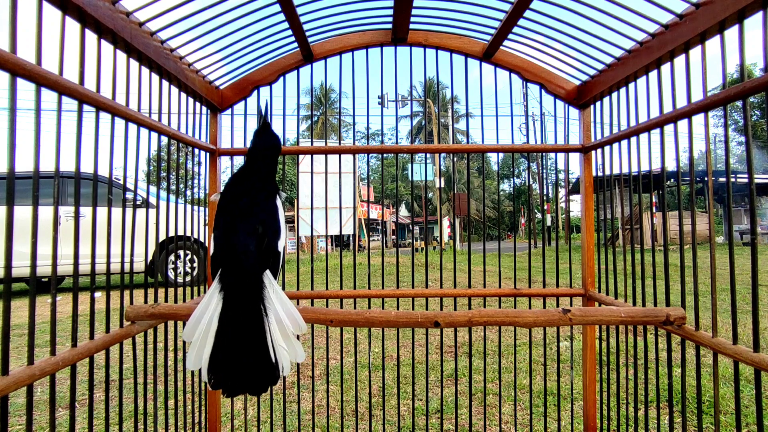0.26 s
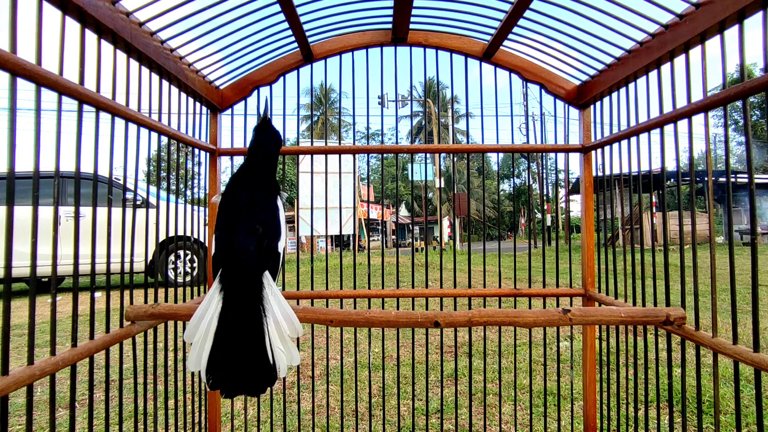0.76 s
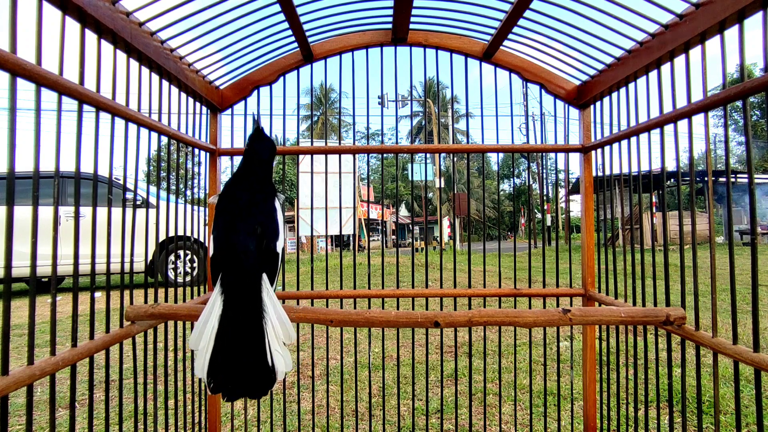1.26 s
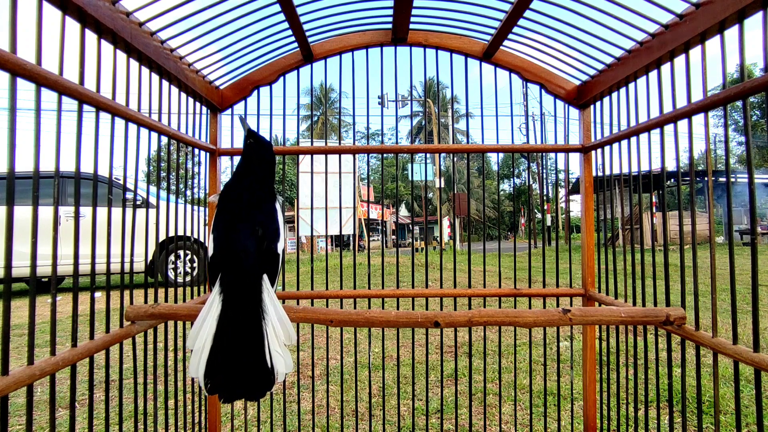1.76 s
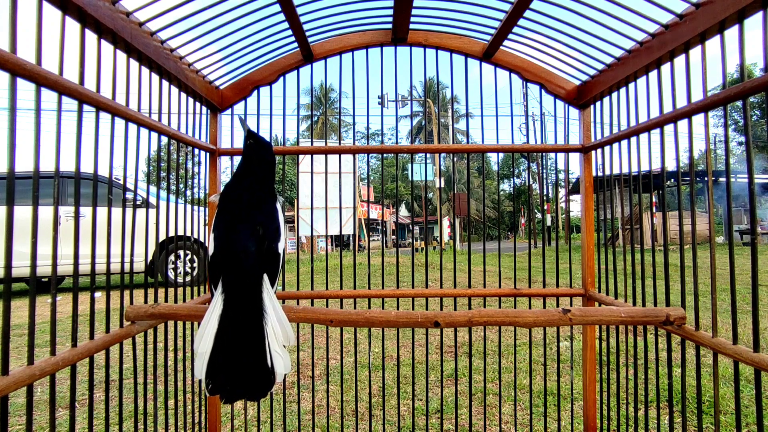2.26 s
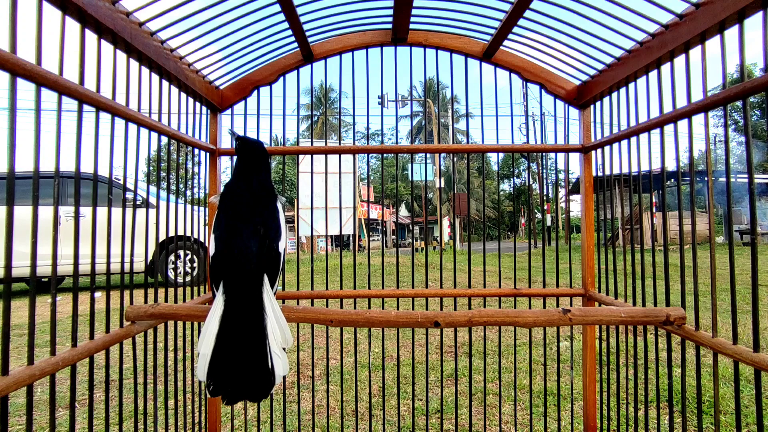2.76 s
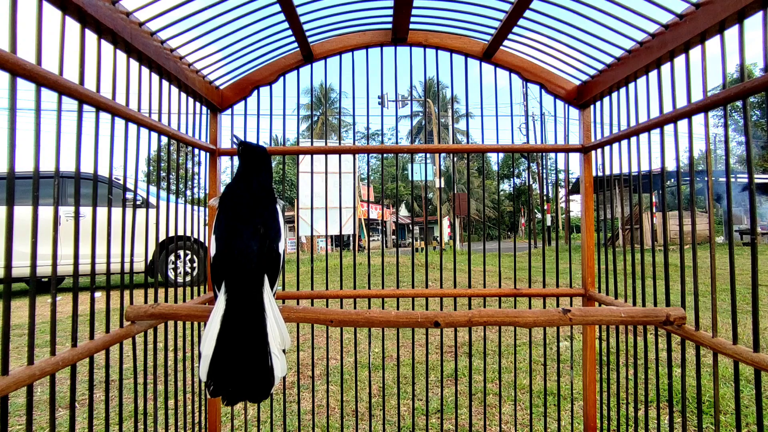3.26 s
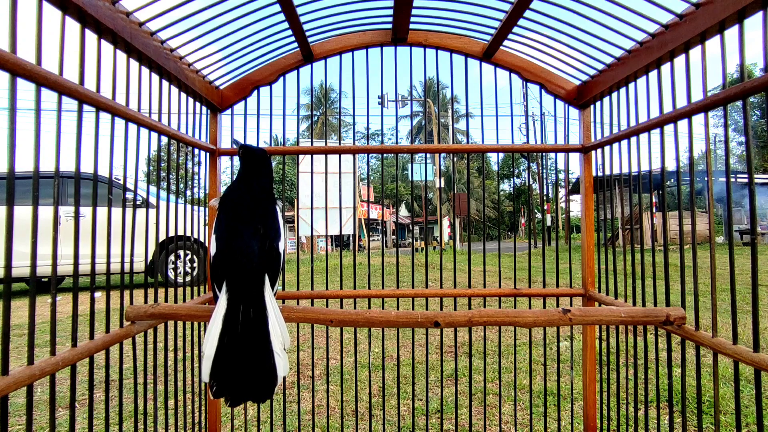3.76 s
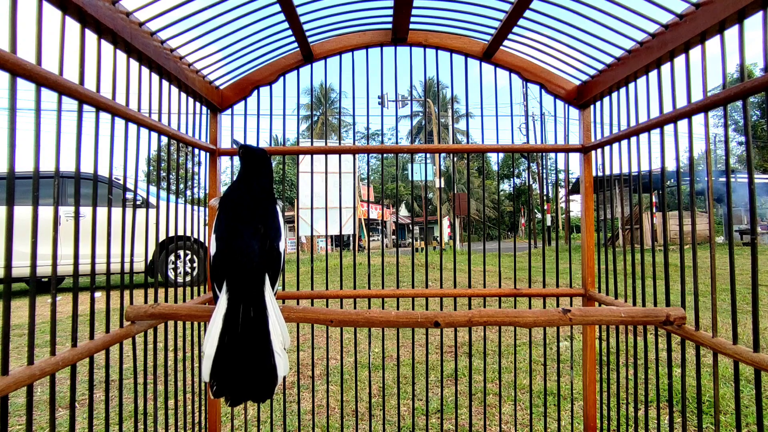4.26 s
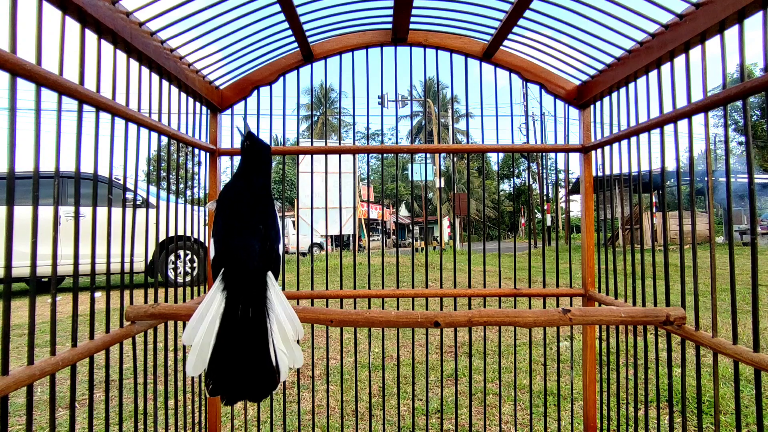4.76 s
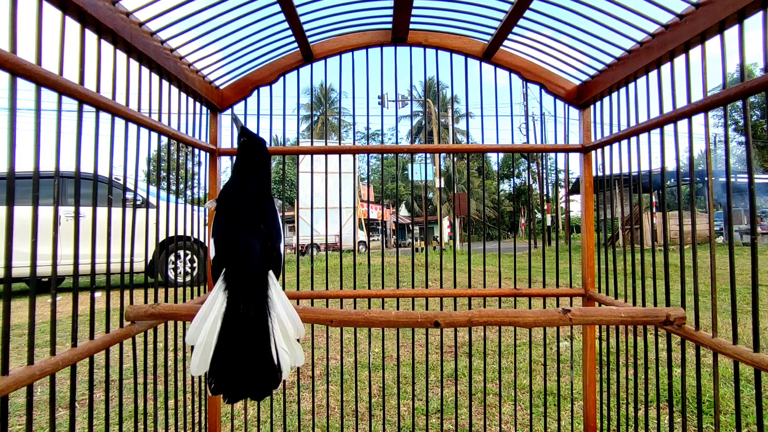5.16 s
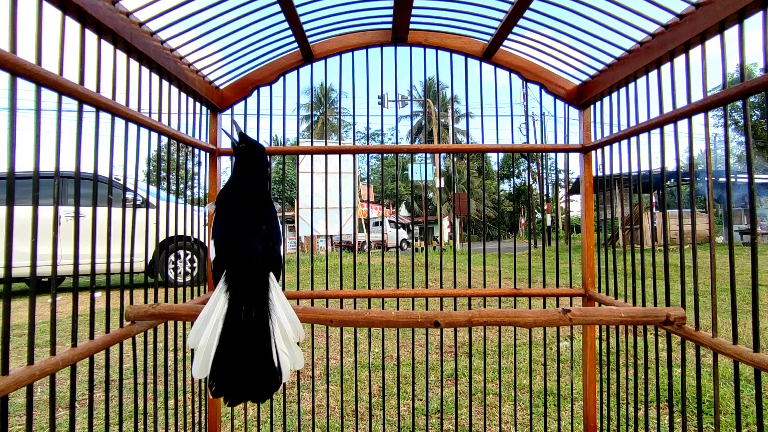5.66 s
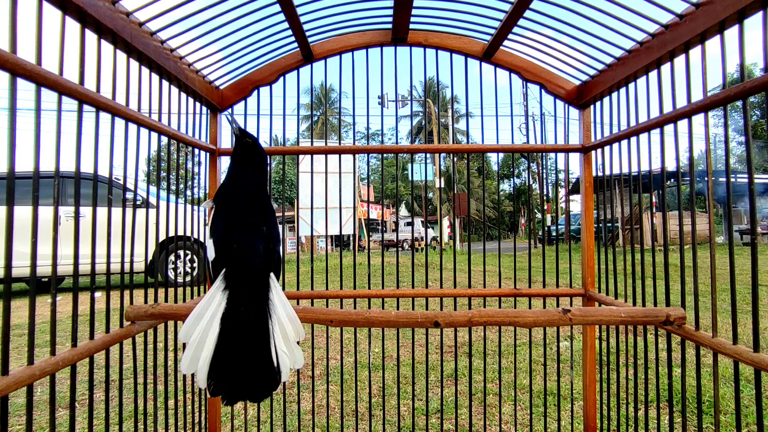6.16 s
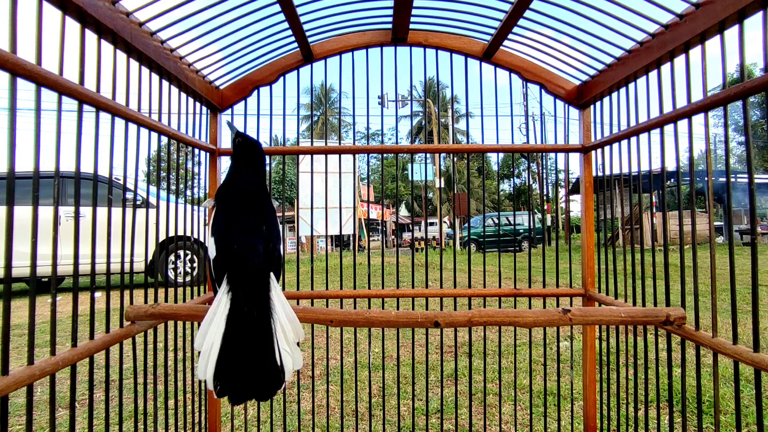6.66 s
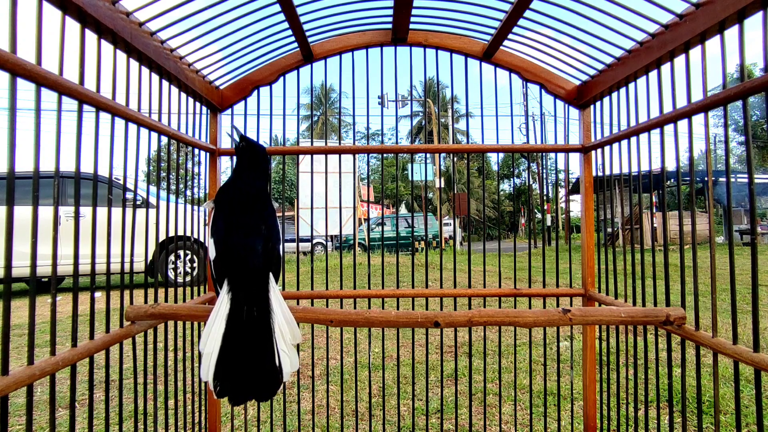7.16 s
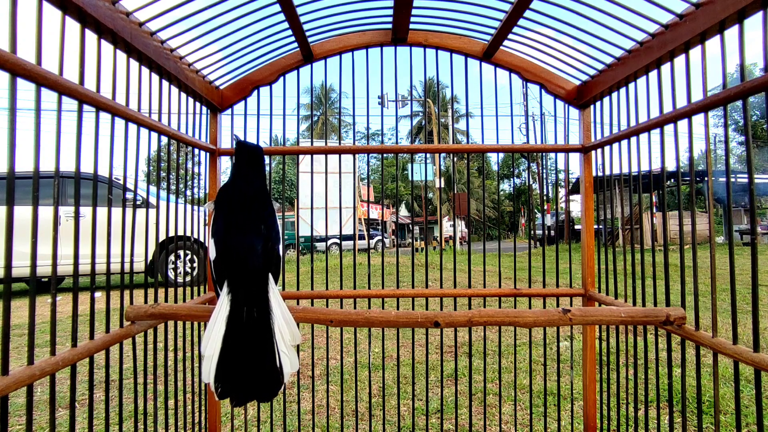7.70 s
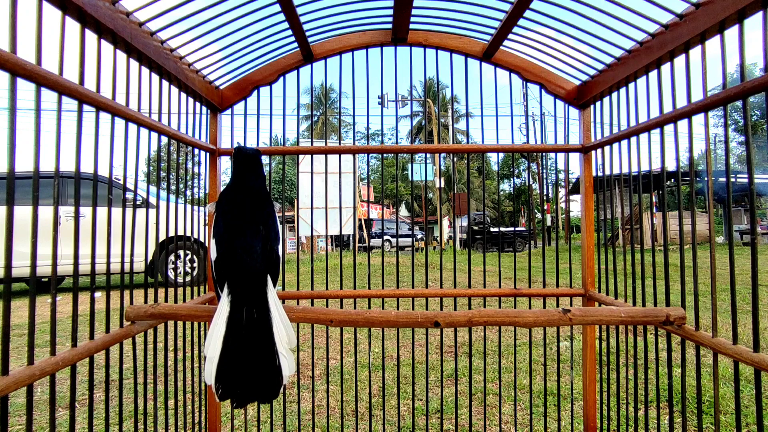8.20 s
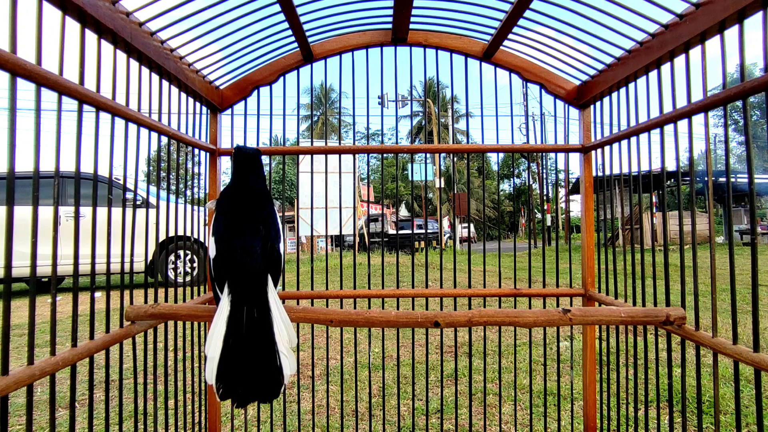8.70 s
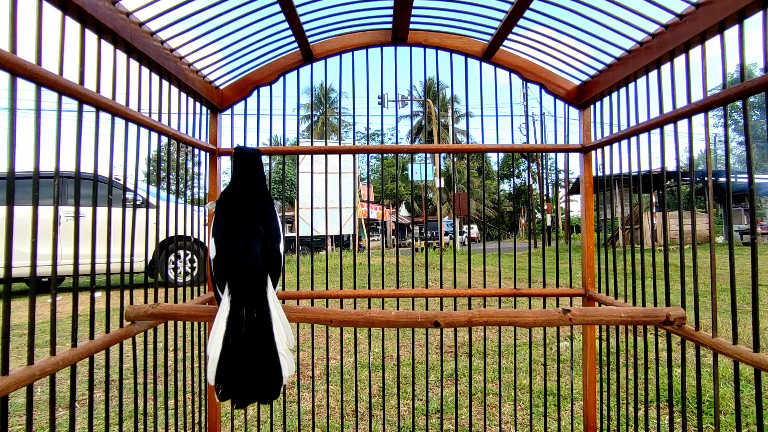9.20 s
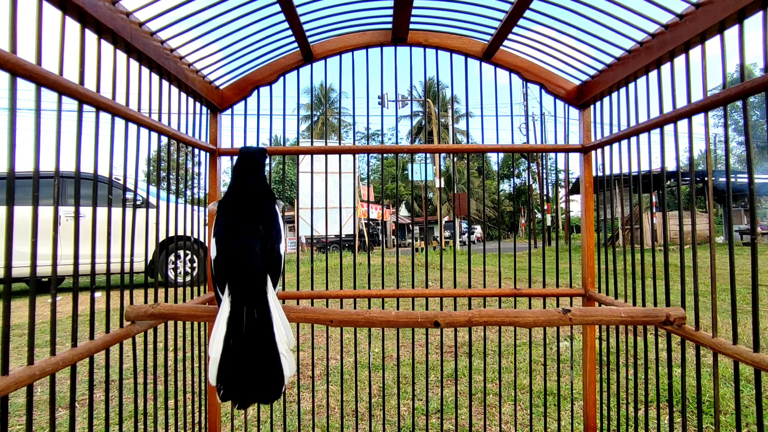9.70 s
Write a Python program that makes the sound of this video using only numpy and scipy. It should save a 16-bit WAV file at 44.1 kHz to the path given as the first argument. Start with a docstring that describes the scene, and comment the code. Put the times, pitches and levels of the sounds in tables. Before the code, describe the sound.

A caged songbird sings very close to a stereo microphone outdoors: trilled whistles and quick slurs, three sharp chips around two seconds, then more trills, a cluster of harsh rasps after four seconds, two hollow hoots, and mixed chirps and whistles to the end. Short cage reflections and a faint tail from houses surround it, over low traffic rumble.

```python
"""On a lawn near houses, a caged magpie-robin sings close by: whistles, trills, two-voiced chirps, harsh rasps.
Each side of its syrinx is an oscillator with its own pitch; the two are mixed nonlinearly in the throat.
The cage answers with short reflections and scatter, the houses with a faint, longer diffuse tail.
Faint high strands include a distant bird's thin whistle. Traffic on a road behind is shaped noise
with one droning engine; the open air adds a soft hiss."""
import sys
import numpy as np
from scipy import signal
from scipy.fft import rfft, irfft, next_fast_len
from scipy.io import wavfile
from scipy.ndimage import uniform_filter1d, minimum_filter1d, map_coordinates

SR = 44100
rng = np.random.default_rng(int(sys.argv[2]) if len(sys.argv) > 2 else 0)


def unload_audio(sound):
    """Save the sound as a 16-bit wav file, at the path given as the first command line argument."""
    columns = np.transpose(np.atleast_2d(sound))
    # keep every value between -1 and 1, then stretch to whole-number steps
    steps = np.round(np.clip(columns, -1, 1) * 32767)
    wavfile.write(sys.argv[1], SR, steps.astype(np.int16))


N = 438354
T = np.arange(N) / SR


def amp(db):
    """Logarithmic level: decibels to amplitude gain."""
    return 10 ** (np.asarray(db) / 20)


def unit(x):
    """Normalization: scale to rms 1."""
    return x / np.sqrt(np.mean(x ** 2) + 1e-20)


def along(points, hz):
    """Logarithmic frequency scale: interpolate (frequency, value) points along it."""
    frequency, value = np.transpose(points)
    return np.interp(np.log(hz + 1), np.log(frequency + 1), value)


def curves(rows, t):
    """Linear interpolation: each column after the first, read at t."""
    at, *columns = np.transpose(rows)
    return [np.interp(t, at, column) for column in columns]


def stretch(start, end, fade=.002):
    """Gating: sample indices between two times, and a gate whose soft edges avoid clicks."""
    i = np.flatnonzero((T > start - fade) & (T < end + fade))
    to_edge = np.minimum(T[i] - start + fade, end + fade - T[i])
    return i, np.clip(to_edge / (2 * fade), 0, 1)


def span(start, length):
    """Local time: sample indices of a note, and the time since its start."""
    i, _ = stretch(start, start + length)
    return i, T[i] - start


def wobble(t, rate):
    """Random modulation: a smooth curve through random knots, rate of them a second."""
    at = np.arange(len(t)) * rate / SR
    knots = rng.standard_normal(int(len(t) * rate / SR) + 4)
    return map_coordinates(knots, [at + 1])


def filtered(x, response):
    """Linear filtering: the spectrum of x times a complex response of frequency."""
    m = next_fast_len(N + SR // 4)
    return irfft(rfft(x, m) * response(np.fft.rfftfreq(m, 1 / SR)), m)[..., :N]


def noise(spectrum):
    """Coloured noise: white noise shaped by a spectrum, at rms 1."""
    return unit(filtered(rng.standard_normal(N), lambda hz: amp(along(spectrum, hz))))


def tone(hz, partials, pure_hz=4700):
    """Harmonic series on a moving pitch: a 0 dB partial has rms 1; the highest whistles are nearly pure."""
    phase = 2 * np.pi * np.cumsum(hz) / SR
    richness = 1 / (1 + (hz / pure_hz) ** 10)
    total = 0
    for multiple, db in partials:
        below_nyquist = multiple * hz < SR / 2
        strength = richness if round(multiple) > 1 else 1
        total = total + amp(db) * np.sin(round(multiple) * phase) * below_nyquist * strength
    return np.sqrt(2) * total


def flanks(t, attack, hold, release):
    """Envelope phases: distance out on the attack (1 to 0) and on the release (0 to 1)."""
    coming = np.clip(1 - t / max(attack, 1 / SR), 0, 1)
    going = np.clip((t - attack - hold) / max(release, 1 / SR), 0, 1)
    return coming, going


def swell(t, loudest, length, flatness):
    """Swell envelope: 0 at the loudest moment, 1 at both ends."""
    return sum(flanks(t, loudest, 0, length - loudest)) ** flatness


# held notes with glides: (side, start [s], glide in [s], hold [s], glide out [s], first pitch [Hz],
# held pitch [Hz], drifted to [Hz], last pitch [Hz], level [dB], utmost roughness [0-1])
WHISTLE_NOTES = [ ("high", 0, .002, .135, .01, 4235, 4235, 4100, 4000, -18, .1),
                 ("high", .707, .028, .055, .015, 3330, 4220, 4100, 3860, -12.5, .1),
                 ("low", 1.266, .032, .155, .018, 1960, 2600, 2980, 2300, -8.5, .2),
                 ("low", 3.018, .005, .105, .008, 2050, 2100, 2380, 2010, -10, 0),
                 ("high", 3.421, .085, .237, .008, 4100, 4430, 3600, 3410, -16.5, .4),
                 ("low", 5.803, .02, .055, .012, 2900, 2680, 2720, 2950, -12, 0),
                 ("low", 5.987, .028, .063, .012, 2860, 2560, 2580, 2650, -15.5, 0),
                 ("high", 6.54, .025, .19, .06, 3500, 3810, 3800, 4450, -16, 0),
                 ("high", 7.725, .025, .118, .018, 1960, 3040, 2760, 3780, -17.5, 0),
                 ("low", 8.175, .05, .085, .046, 1620, 3030, 2620, 1930, -19.5, 0),
                 ("low", 8.572, .03, .07, .078, 1970, 3060, 2740, 1950, -17, 0), ]
# rounding of the glides; how much softer they end; how late they fade
GLIDE_BEND, GLIDE_EDGE_DB, GLIDE_FADE = 1.3, 16, 2.1


def whistles():
    """Sustained oscillation: pitch glides in, drifts while held at full strength, and glides out."""
    for side, start, attack, hold, release, first, held, drifted, last, db, rough in WHISTLE_NOTES:
        length = attack + hold + release
        _, t = span(start, length)
        coming, going = flanks(t, attack, hold, release)
        hz = np.interp(t, [attack, attack + hold], [held, drifted])
        hz += (first - held) * coming ** GLIDE_BEND + (last - drifted) * going ** GLIDE_BEND
        level_db = db - GLIDE_EDGE_DB * (coming + going) ** GLIDE_FADE
        yield side, start, length, hz, level_db, rough


# short notes that turn once: (side, start [s], time to the turn [s], time after it [s], first pitch [Hz],
# turn pitch [Hz], last pitch [Hz], level [dB], loudest after [s], utmost roughness [0-1])
SLUR_NOTES = [ ("high", .12, .045, .06, 4400, 3900, 2200, -12.5, .05, 1),
              ("low", .122, .035, .03, 3500, 3000, 2600, -17, .036, 1),
              ("low", .48, .017, .025, 4340, 3940, 3200, -6, .017, .4),
              ("low", .768, .04, .037, 4450, 3550, 2180, -13, .018, .37),
              ("low", .848, .085, .079, 4000, 4300, 4980, -12, .135, 0),
              ("low", 1.497, .031, .036, 2500, 3750, 1850, -9.5, .027, .5),
              ("high", 1.57, .07, .05, 3700, 4600, 3250, -16, .035, .7),
              ("low", 1.61, .023, .041, 2860, 3800, 1940, -12.5, .023, .75),
              ("high", 2.765, .085, .036, 3750, 4080, 3500, -9, .083, .6),
              ("low", 2.795, .055, .025, 3330, 3480, 3300, -13, .055, .67),
              ("low", 2.963, .036, .016, 1580, 1830, 1870, -23, .036, 0),
              ("high", 3.13, .065, .037, 3470, 4490, 3200, -13, .085, .5),
              ("low", 3.162, .043, .03, 2800, 3250, 2650, -19, .062, .5),
              ("high", 3.226, .014, .042, 3400, 3750, 2060, -10, .014, .6),
              ("low", 3.25, .025, .019, 3000, 3250, 3100, -13.5, .016, .4),
              ("high", 3.335, .014, .038, 5770, 3400, 3000, -12.5, .019, .44),
              ("low", 3.422, .02, .022, 2900, 3550, 3600, -12, .022, .3),
              ("low", 3.5, .024, .044, 4700, 3650, 2300, -12.5, .022, .4),
              ("low", 3.76, .07, .057, 2520, 2670, 2570, -32, .07, 0),
              ("high", 3.897, .031, .009, 3900, 4610, 4770, -20, .029, 0),
              ("low", 3.905, .035, .017, 2710, 3190, 3160, -19, .044, 0),
              ("high", 3.946, .022, .046, 5300, 3700, 2200, -6.5, .013, .48),
              ("low", 5.675, .04, .035, 1900, 3350, 3600, -13.5, .056, .3),
              ("high", 5.722, .02, .04, 4700, 5430, 4800, -11, .022, .95),
              ("high", 5.79, .058, .051, 4490, 4200, 2810, -10.5, .05, .45),
              ("high", 6.432, .028, .013, 4500, 6170, 5000, -12, .028, .65),
              ("high", 6.5, .022, .024, 4370, 4250, 3400, -5, .022, .25),
              ("low", 6.542, .016, .016, 2700, 2800, 2600, -10, .014, .2),
              ("high", 6.959, .023, .028, 4160, 6150, 4900, -13, .022, .4),
              ("high", 7.022, .022, .048, 4010, 4240, 3100, -8, .036, .1),
              ("high", 7.294, .027, .012, 3870, 5960, 4370, -13.5, .026, .3),
              ("high", 7.363, .035, .052, 4170, 3950, 2900, -8, .018, .25),
              ("low", 7.406, .022, .032, 3090, 2990, 2870, -11, .024, .3),
              ("low", 9.112, .018, .01, 3600, 5300, 5900, -20, .015, 0), ]
# rounding of the turn; the ends are this much softer; flatness of the swell
SLUR_BEND, SLUR_EDGE_DB, SLUR_SWELL = 1.2, 16, 2.2


def slurs():
    """Frequency sweep: pitch glides to a turning point and away, on one swell."""
    for side, start, to_turn, after, first, turn, last, db, loudest, rough in SLUR_NOTES:
        length = to_turn + after
        _, t = span(start, length)
        coming, going = flanks(t, to_turn, 0, after)
        hz = turn + (first - turn) * coming ** SLUR_BEND + (last - turn) * going ** SLUR_BEND
        level_db = db - SLUR_EDGE_DB * swell(t, loudest, length, SLUR_SWELL)
        yield side, start, length, hz, level_db, rough


# long winding notes: (side, [(time [s], pitch [Hz], level [dB]), ...])
WINDING_NOTES = [ ("high", [(.285, 3010, -40), (.328, 4675, -8), (.345, 4180, -8.5), (.38, 3923, -9.5),
                 (.47, 4133, -11), (.5, 4450, -14), (.517, 4690, -2), (.525, 3670, -18.5),
                 (.553, 2160, -31)]), ("high", [(.795, 3860, -18), (.84, 4240, -14), (.88, 4950, -15),
                 (.975, 5790, -18), (1.015, 5770, -12), (1.04, 4730, -5), (1.066, 3840, -26.5)]),
                 ("high", [(1.235, 3704, -38), (1.26, 4480, -12.5), (1.285, 5180, -22),
                 (1.374, 5550, -14.5), (1.398, 3200, -10)]), ("low", [(2.704, 1500, -32), (2.75, 2060, -13),
                 (2.79, 1330, -22.5), (2.82, 1150, -29), (2.862, 1410, -29)]), ("high", [(5.277, 3550, -23),
                 (5.31, 3860, -16.5), (5.4, 3927, -18.5), (5.495, 3807, -15), (5.53, 4260, -20),
                 (5.562, 4483, -9.5), (5.574, 4620, -23)]), ("low", [(6.922, 2120, -42), (6.96, 2320, -24),
                 (6.99, 3450, -16.5), (7.045, 3850, -17), (7.098, 2630, -20), (7.128, 2560, -16.5),
                 (7.146, 2530, -35)]), ("low", [(7.638, 2200, -31), (7.652, 2400, -21), (7.68, 1550, -26.5),
                 (7.712, 1200, -30.5), (7.75, 1500, -21), (7.8, 1630, -22), (7.855, 1990, -13),
                 (7.925, 2160, -10), (7.952, 2110, -25)]), ("high", [(8.063, 2200, -24), (8.112, 3380, -16),
                 (8.135, 3600, -3.5), (8.213, 3455, -16), (8.23, 4200, -13), (8.308, 4290, -11),
                 (8.34, 4050, -12), (8.367, 3540, -31)]), ("high", [(9.127, 4210, -22), (9.155, 4770, -5),
                 (9.174, 4925, -5), (9.19, 5440, -10.5), (9.213, 5440, -8), (9.228, 5330, -41)]),
                 ("low", [(9.43, 1380, -32), (9.49, 1730, -20), (9.52, 2000, -17), (9.55, 2500, -14.5),
                 (9.6, 2900, -15), (9.665, 1850, -25), (9.7, 1490, -24), (9.738, 1400, -33.5)]), ]
WINDING_ROUGH = .27  # utmost roughness, 0-1


def winding():
    """Continuous frequency modulation: pitch and level of a long note turn several times."""
    for side, points in WINDING_NOTES:
        start, length = points[0][0], points[-1][0] - points[0][0]
        _, t = span(start, length)
        hz, db = curves(points, start + t)
        yield side, start, length, hz, db, WINDING_ROUGH


# three like chips: (start [s], length [s], upward flick [Hz], level [dB])
CHIP_NOTES = [(1.793, .075, 450, -11), (2.025, .085, 750, -10), (2.333, .097, 1100, -10.5)]
# contour common to them: (time [share of the length], pitch [Hz], level [dB relative to the chip])
CHIP_SHAPE = [(0, 3080, -22), (.21, 3720, -2), (.49, 4100, 0), (.64, 4300, -15), (.78, 4050, 0),
              (1, 2950, -20)]
FLICK_AT, FLICK_WIDTH = .64, .09  # shares of the length
CHIP_ROUGH = .5  # utmost roughness, 0-1


def chips():
    """Repeated contour: each chip is longer, with a higher pitch flick on which the voice thins."""
    for start, length, flick_hz, db in CHIP_NOTES:
        share = span(start, length)[1] / length
        hz, shape_db = curves(CHIP_SHAPE, share)
        flick = flick_hz * np.exp(-((share - FLICK_AT) / FLICK_WIDTH) ** 2)
        yield "high", start, length, hz + flick, db + shape_db, CHIP_ROUGH


# faint high strands: octave overtones of the low side's notes (the first two rows), short faint whistles,
# and a distant bird's thin whistle (4.4-4.65 s):
# (start [s], end [s], first pitch [Hz], last pitch [Hz], level [dB])
FAINT_STRANDS = [(3.16, 3.21, 5600, 6400, -35), (3.91, 3.958, 5610, 6750, -20),
                 (4.008, 4.094, 5320, 6300, -41), (4.137, 4.145, 3300, 3120, -33),
                 (4.163, 4.168, 3140, 3230, -30), (4.19, 4.204, 3240, 3350, -35),
                 (4.41, 4.48, 3870, 3800, -43), (4.494, 4.637, 3900, 3800, -46)]
# harmonics of these strands and of the high side: (multiple of the pitch, level [dB])
HIGH_OVERTONES = [(1, 0), (2, -22.5), (3, -27)]


def faint_strands():
    """Linear frequency glides: octave overtones of low notes, faint whistles and a distant bird's whistle."""
    strands = np.zeros(N)
    for start, end, first_hz, last_hz, db in FAINT_STRANDS:
        i, gate = stretch(start, end, fade=0.0077)
        hz = np.linspace(first_hz, last_hz, len(i)) * (1 + 0.0061 * wobble(i, 90))
        strands[i] += gate * amp(db) * tone(hz, HIGH_OVERTONES)
    return strands


# harsh calls: (start [s], length [s], loudest after [s], low band [Hz], high side at first [Hz],
# low band [dB], high side [dB], hiss [dB]), the levels before the trims in rasps()
RASP_CALLS = [(4.312, .084, .05, 2540, 5000, -19, -12.5, -11),
              (4.47, .097, .04, 2680, 5500, -21, -18.5, -16),
              (4.672, .128, .035, 2710, 5200, -16, -15.5, -17),
              (4.835, .087, .042, 2870, 4550, -17, -12, -18), (4.94, .076, .048, 2850, 4050, -34, -23, -30),
              (9.826, .099, .058, 2600, 4750, -25, -16.5, -17)]
# harmonics of the deep voice: (multiple of the pitch, level [dB])
SCOLD_HARMONICS = [(2, 3), (3, -3.5), (4, -3.5), (5, -11), (6, -11.5), (7, -26), (9, -22), (10, -38)]
# pitch share that the high side sinks; fade at the ends; flatness of the swell
RASP_SAG, RASP_EDGE_DB, RASP_SWELL = .13, 25, 2.4


def rasps(low_jitter=0.038, high_jitter=.045, jitter_rate=1000, shimmer_db=5,
          low_db=-1, high_db=-2, hiss_db=1):
    """Irregular vibration: a deep voice of fluttering harmonics, a rough high side and strong turbulence."""
    voice, stir = np.zeros((2, N))
    for start, length, loudest, low_hz, first_hz, low, high, hiss in RASP_CALLS:
        i, gate = stretch(start, start + length)
        t = T[i] - start
        gate = gate * amp(-RASP_EDGE_DB * swell(t, loudest, length, RASP_SWELL))

        def flutter(hz, partials):
            """Shimmer: random amplitude modulation of a tone."""
            return unit(tone(hz, partials) * amp(shimmer_db * wobble(i, 600.5)))

        # the low band is the second harmonic of the deep voice
        deep_hz = low_hz / 2 * (1 + low_jitter * wobble(i, jitter_rate))
        deep = sum(amp(db) * flutter(deep_hz, [(multiple, 0)]) for multiple, db in SCOLD_HARMONICS)
        sinking_hz = first_hz * (1 - RASP_SAG * t / length)
        shrill = flutter(sinking_hz * (1 + high_jitter * wobble(i, jitter_rate)), HIGH_OVERTONES)
        voice[i] = gate * (amp(low + low_db) * deep + amp(high + high_db) * shrill)
        stir[i] = gate * amp(hiss + hiss_db)
    return voice, stir


# deep hollow hoots: (start [s], length [s], top pitch [Hz], level [dB])
HOOT_NOTES = [(5.332, .14, 1300, -7), (6.103, .138, 1350, -7.5)]
HOOT_TOP, HOOT_LOUDEST = .6, .74  # shares of the length
HOOT_DROOP, HOOT_EDGE_DB = .12, 21  # pitch share dropped, and fade, at the ends


def hoots():
    """Arched frequency contour: shallow arches that are loudest just after their top."""
    for start, length, top_hz, db in HOOT_NOTES:
        _, t = span(start, length)
        hz = top_hz * (1 - HOOT_DROOP * swell(t, HOOT_TOP * length, length, 2))
        level_db = db - HOOT_EDGE_DB * swell(t, HOOT_LOUDEST * length, length, 2.6)
        yield "low", start, length, hz, level_db, 0


# a note turns rough where its pitch falls this fast (share per s), within this time (s)
BREAK_PER_S, BREAK_S = 1.5, .02


def breaking(hz, late=.6):
    """Loss of periodicity, 0-1: the membrane loses its clean tone as pitch falls, more so late in a note."""
    fall_per_s = -np.gradient(np.log(hz)) * SR
    falling = np.clip(fall_per_s / BREAK_PER_S, 0, 1) ** 2
    smooth = uniform_filter1d(falling, size=max(int(BREAK_S * SR), 1))
    return smooth * np.linspace(0, 1, len(hz)) ** late


# trills shake whatever note their side sings: (side, start [s], end [s], first rate [per s],
# last rate [per s], pitch swing either way [Hz], dip on each upswing [dB], negative for a boost)
TRILL_SPANS = [("high", 0, .144, 51, 44, 1040, 6), ("high", 1.02, 1.056, 67, 90, 398, -.5),
               ("low", 2.733, 2.781, 48.8, 47.2, 352, 2), ("high", 2.765, 2.872, 150, 100, 190, 3),
               ("low", 3.023, 3.136, 40.3, 38, 128, 36), ("high", 3.424, 3.754, 49.5, 41.7, 1164, 2.5),
               ("high", 5.736, 5.776, 95, 110, 560, 3), ("high", 5.799, 5.875, 110, 96, 221, -2),
               ("high", 6.527, 6.552, 92, 120, 220, 2), ("high", 7.05, 7.09, 110, 120, 228, 2),
               ("high", 7.393, 7.44, 89.5, 157, 130, 2), ("low", 7.64, 7.699, 141, 144.6, 294, -5.5),
               ("high", 8.06, 8.117, 70, 80, 390, -3), ("high", 8.307, 8.362, 50, 39, 447, 18),
               ("low", 9.535, 9.668, 102.6, 97.1, 310, -13.5)]
# harmonics of the deepest notes: (multiple of the pitch, level [dB])
HOLLOW_HARMONICS = [(1, -24), (2, -1), (3, -19), (4, -33.5), (5, -41)]
# share of a note's roughness heard in a trill; turbulence of a clean note
TRILL_ROUGH, CLEAN_HISS = .45, .03


def syrinx(side, partials, jitter=0.0832, jitter_rate=500, shimmer_db=2.0, pressed_db=-13, hollow_hz=1500):
    """Self-sustained oscillation: one side's whistle, and the strength of the turbulence it stirs."""
    swing, dip, shaken, voice, stir = np.zeros((5, N))

    def own(rows):
        """Independent sources: only the rows of this side."""
        return [row[1:] for row in rows if row[0] == side]

    for start, end, first, last, swing_hz, dip_db in own(TRILL_SPANS):
        i, gate = stretch(start, end)
        beat = 2 * np.pi * np.cumsum(np.linspace(first, last, len(i))) / SR
        swing[i], shaken[i] = swing_hz * np.cos(beat) * gate, gate
        dip[i] = dip_db * np.maximum(-np.sin(beat), 0) ** 2 * gate

    notes = [*slurs(), *whistles(), *chips(), *hoots(), *winding()]
    for start, length, hz, db, roughness in own(notes):
        i, gate = stretch(start, start + length)
        # a note's roughness comes out in its falls and trills
        rough = np.clip(roughness * np.maximum(breaking(hz), TRILL_ROUGH * shaken[i]), 0, 1)
        # a hard-driven membrane flutters chaotically in pitch and strength
        flutter = jitter * rough * wobble(i, jitter_rate)
        pitch = (hz + swing[i]) * (1 + flutter + 0.0025 * wobble(i, 121))
        level = gate * amp(db - dip[i] + shimmer_db * rough * wobble(i, 400))
        # the throat cannot tune down to the deepest notes and rings on their octave
        whistle = tone(pitch, HOLLOW_HARMONICS if hz.max() < hollow_hz else partials)
        # pressing also strengthens the second harmonic
        pressed = rough * tone(pitch, [(2, pressed_db)])
        voice[i] += level * (whistle + pressed)
        stir[i] += level * (rough + CLEAN_HISS + np.abs(swing[i]) / 6000)
    return voice, stir


# harmonics of the low side: (multiple of the pitch, level [dB])
LOW_SIDE_OVERTONES = [(1, 1), (2, -32.5), (3, -35.5)]
# turbulence in the bird's breath: (frequency [Hz], relative density [dB per Hz])
BREATH_SPECTRUM = [(710, -62.5), (1200, -21), (1290, -44), (2030, -7), (2260, -10.5), (2650, 0), (3100, 1),
                   (3950, -12), (5470, -9), (6620, 2.5), (8000, -10.5), (10900, -16), (13300, -21),
                   (14300, -31), (14900, -51)]


def bird(sum_db=-10, cross_db=-3, breath_db=-11):
    """Intermodulation: both sides, their combination tones and turbulence, with the faint strands added."""
    high, high_stir = syrinx("high", HIGH_OVERTONES)
    low, low_stir = syrinx("low", LOW_SIDE_OVERTONES, jitter=0.115, jitter_rate=520, shimmer_db=2,
                           pressed_db=-15)
    harsh, harsh_stir = rasps()
    # each side modulates the other; the throat passes only the high products
    mixed = amp(sum_db) * high * low + amp(cross_db) * high * low * (high + low)
    throat = [(1200, -47.5), (2600, -7), (6000, -9), (14000, 9.5)]  # (Hz, dB)
    mixed = filtered(mixed, lambda hz: amp(along(throat, hz)))
    breath = unit(noise(BREATH_SPECTRUM) * amp(1.95 * wobble(T, 600)))
    hiss = breath * (amp(breath_db) * (high_stir + low_stir) + harsh_stir)
    return high + low + harsh + mixed + hiss + faint_strands()


# phase of the song at the left port ahead of the right: (frequency [Hz], left lead [rad])
PORT_LEAD = [(1200, 1.83), (1900, 2.5), (2600, 1.6856), (3100, 4.5), (4000, 5), (4500, 8.5), (5400, 7),
             (8000, 11.5), (15000, 19.5)]
# level between the ports: (frequency [Hz], left minus right [dB])
PORT_BALANCE = [(1200, 5), (1750, 2.5), (2250, -5), (2550, 5), (2900, -2), (3400, -1.5), (4200, 2.5),
                (4700, 3), (5500, -1.5), (8000, 8), (12000, 1)]
# reflections from the cage: (left delay [ms], left level [dB], right delay [ms], right level [dB])
CAGE_REFLECTIONS = [(1.298, -42.5, 2.1, -12.5), (3.398, -20.5, 4.1, -13), (6.1, -14.5, 7.9, -17)]


def ports(x):
    """Phase and level differences: the left microphone port leads; each has its own cage reflections."""
    def response(hz):
        def port(sign):
            """Phase and level difference, half of each to either port."""
            return amp(sign * along(PORT_BALANCE, hz) / 2) * np.exp(sign * .5j * along(PORT_LEAD, hz))

        def echo(ms, db):
            """Delay as a linear phase shift."""
            return amp(db) * np.exp(-2j * np.pi * hz * ms / 10 ** 3)

        direct = np.array([port(1), port(-1)])
        echoes = sum(np.array([echo(*row[:2]), echo(*row[2:])]) for row in CAGE_REFLECTIONS)
        return direct * (1 + echoes)
    return filtered(x, response)


# the bird turns its head: (time [s], left minus right [dB])
HEAD_TURNS = [(.3, -1), (1.2, 0), (1.7, -1.5), (2.2, 0.5), (2.8, 1), (3.6, -0.5), (4.3, 1.5), (4.8, -2.5),
              (5.4, 1), (5.8, 1), (6.1, -2.5), (6.6, 0.5), (7.2, -3), (7.8, 1.5), (8.25, -4), (8.65, 4),
              (9.2, -3.5), (9.7, -3)]


def facing():
    """Source directivity: the head turns as a gain at either port."""
    turn_db, = curves(HEAD_TURNS, T)
    return amp(np.array([turn_db, -turn_db]) / 2)


def diffuse(x, decay):
    """Diffuse reverberation: different at each port, every frequency dying at its own speed."""
    hz, t, z = signal.stft(rng.standard_normal((2, SR // 2)), SR, nperseg=128)
    dying = z * amp(-60 * t / along(decay, hz)[:, None])
    tail = signal.istft(dying, SR, nperseg=128)[1]
    return signal.fftconvolve(x[None], tail / np.linalg.norm(tail[0]), axes=1)[:, :N]


# scatter among the cage bars: (frequency [Hz], time to fall 60 dB [s])
BAR_DECAY = [(1000, .03), (4000, 0.054), (12000, 0.045)]


def cage_bars(song):
    """Scattering: thin bars scatter mostly the treble."""
    scattered = [(2000, -32), (4500, -20.5), (8000, -0.5), (13000, 4)]  # (Hz, dB)
    return filtered(diffuse(song, BAR_DECAY), lambda hz: amp(along(scattered, hz)))


# answer of the yard and its houses: (frequency [Hz], time to fall 60 dB [s])
YARD_DECAY = [(1000, 0.26), (4000, 0.36), (12000, 0.096)]


def houses(song):
    """Late reverberation: a faint tail that outlasts the scatter of the cage."""
    return amp(-35) * diffuse(song, YARD_DECAY)


# likeness of distant noise at the two ports: (frequency [Hz], left-right correlation [-1 to 1])
LIKENESS = [(50, 1), (125, 0.94), (250, 0.89), (500, 0.66), (1000, 0), (8000, 0.059)]


def rush(spectrum):
    """Spatial coherence: distant stereo noise, alike in the bass and nearly unrelated in the treble."""
    def response(hz):
        turn = np.arccos(np.clip(along(LIKENESS, hz), -1, 1)) / 2
        return amp(along(spectrum, hz)) * np.array([np.cos(turn), np.sin(turn)])
    mid, side = filtered(rng.standard_normal((2, N)), response)
    return unit(np.array([mid + side, mid - side]))


# traffic levels before the trims in road(): (time [s], rumble [dB], engines [dB], tyres [dB])
TRAFFIC_LEVELS = [(0, -29, -29.5, -43), (.6, -36, -34.5, -48.5), (2, -32.5, -32.5, -48.5),
                  (3.5, -32, -31, -48.5), (5.3, -31, -32, -49.5), (6.2, -28, -29, -43),
                  (7.4, -32, -31.5, -45.5), (8.9, -28.5, -28, -44.5), (9.94, -29.5, -28, -46.5)]
# spectra of the three noises: (frequency [Hz], relative density [dB per Hz])
RUMBLE_SPECTRUM = [(12, -52), (20, -15), (38, 2), (70, 0.5), (120, 0), (160, -30), (260, -120)]
ENGINE_SPECTRUM = [(59, -35), (100, -7), (140, -1.5), (210, -7), (400, -16.5), (520, -49), (880, -120)]
TYRE_SPECTRUM = [(250, -34.5), (380, 2.5), (600, -4.5), (1000, -11.5), (2000, -27), (5000, -38.5),
                 (12000, -61.5)]
# a passing engine: (time [s], pitch [Hz], level before trim and harmonics [dB])
PASSING_ENGINE = [(4.8, 139.3, -42.5), (5.7, 136.8, -30.5), (6.3, 139, -33.5), (7.5, 131.7, -34.5),
                  (8.4, 131.1, -32), (9.2, 118.3, -36), (9.94, 112, -31)]


def road(rumble_db=0, engines_db=-1, tyres_db=3, drone_db=-2):
    """Broadband and tonal sources: vehicles rumble and hiss as noise; one engine drones past as harmonics."""
    rumble, engines, tyres = curves(TRAFFIC_LEVELS, T)
    out = amp(rumble + rumble_db) * rush(RUMBLE_SPECTRUM)
    out += amp(engines + engines_db) * rush(ENGINE_SPECTRUM)
    out += amp(tyres + tyres_db + 0.2 * wobble(T, 4.6)) * rush(TYRE_SPECTRUM)

    i, gate = stretch(PASSING_ENGINE[0][0], PASSING_ENGINE[-1][0], fade=.1)
    hz, db = curves(PASSING_ENGINE, T[i])
    level = gate * amp(db + drone_db + 1.3 * wobble(i, 9))
    out[:, i] += level * tone(hz * (1 + 0.01393 * wobble(i, 14)), [(1, 4.5), (2, -22)])
    return out


# outdoor hiss: (frequency [Hz], relative density [dB per Hz])
AIR_SPECTRUM = [(900, -16), (1600, -2.5), (2300, -2), (4000, -10), (6000, -12), (11000, -16.5),
                (12500, -19.5), (15000, -42)]


def open_air():
    """Ambient noise: a steady, faint stereo hiss."""
    return amp(-46) * rush(AIR_SPECTRUM)


def scene():
    """Superposition: the bird in its cage, the yard, the road and the open air."""
    song = bird()
    near = ports(song) * facing()
    return near + cage_bars(song) + houses(song) + road() + open_air()


TOP_HZ = 14350  # upper band limit


def record(dry):
    """Band and peak limiting: a steep low-pass, then a fast limiter that holds the highest peaks."""
    sound = filtered(dry, lambda hz: 1 / (1 + (hz / TOP_HZ) ** 250))
    needed_gain = 1 / np.maximum(np.abs(sound).max(axis=0), 1)
    return sound * uniform_filter1d(minimum_filter1d(needed_gain, size=180), size=130)


dry = scene()
out = record(dry)
unload_audio(out)
```